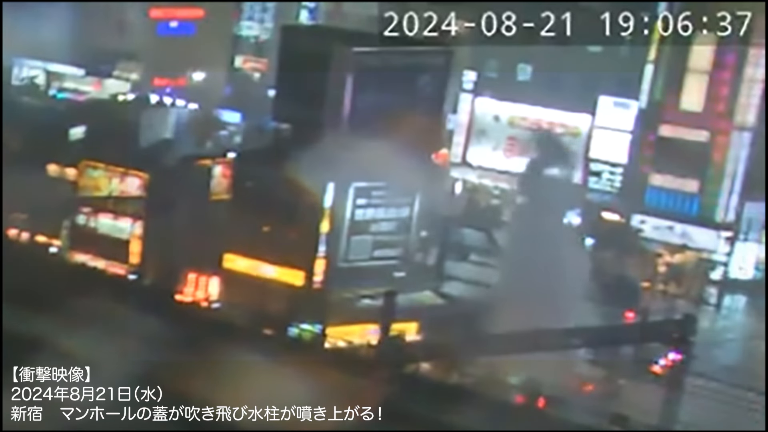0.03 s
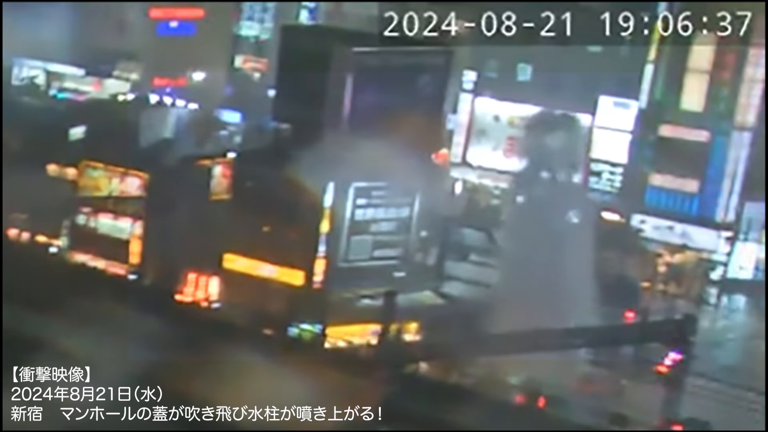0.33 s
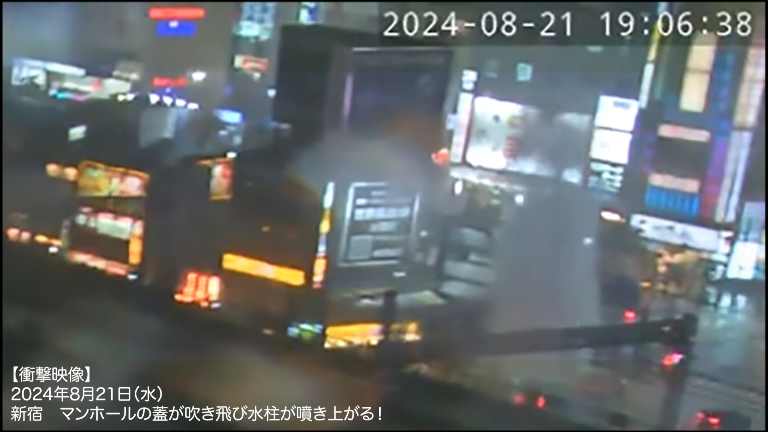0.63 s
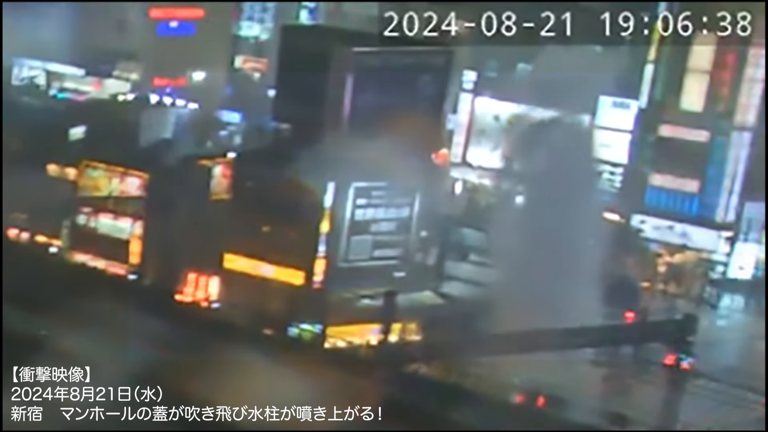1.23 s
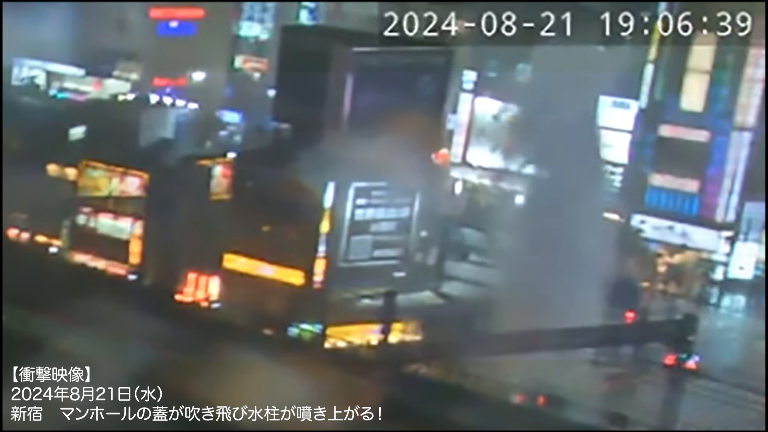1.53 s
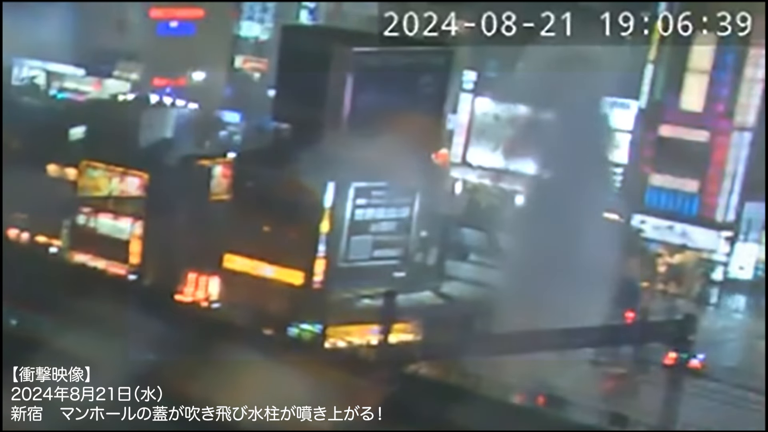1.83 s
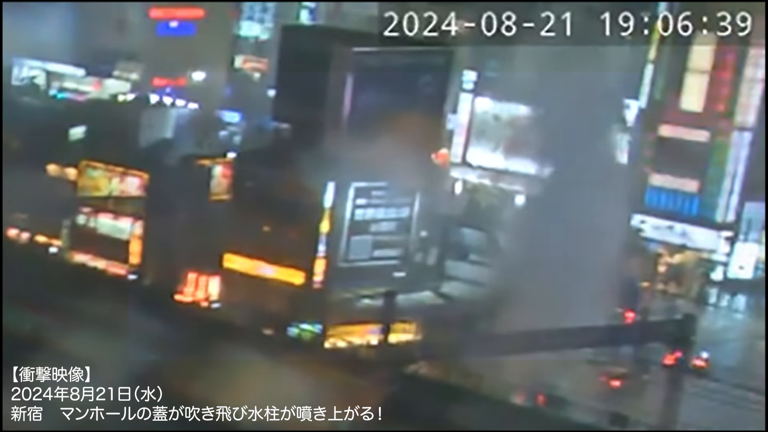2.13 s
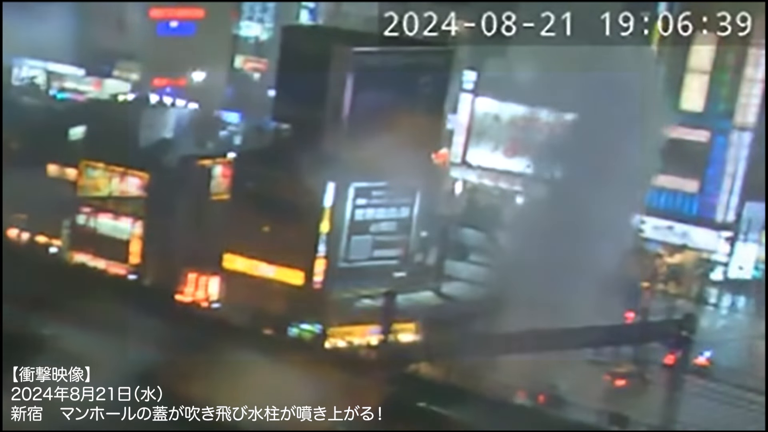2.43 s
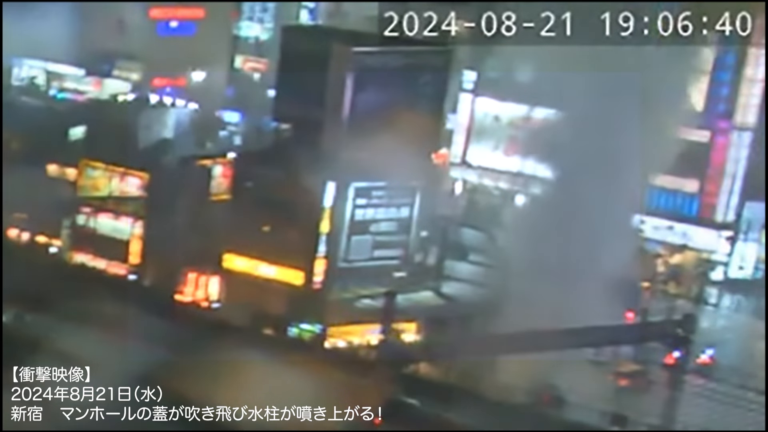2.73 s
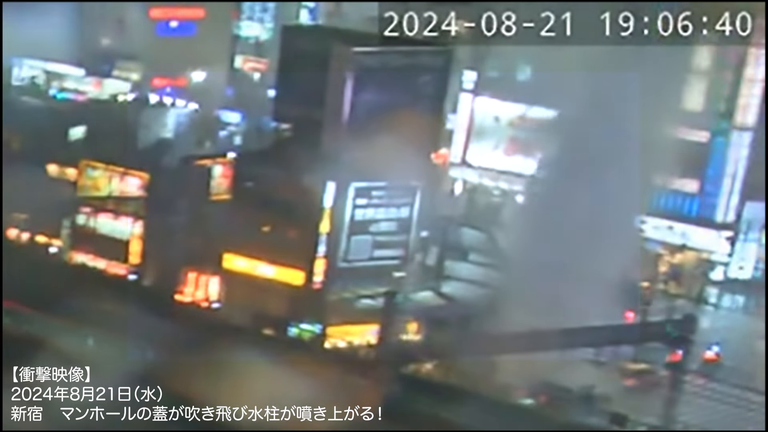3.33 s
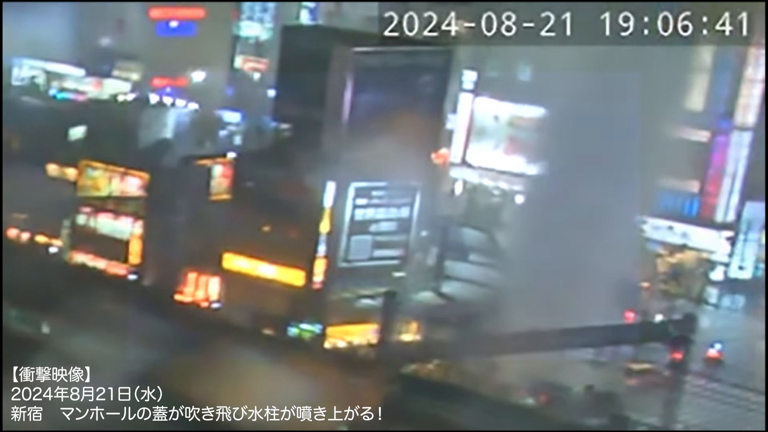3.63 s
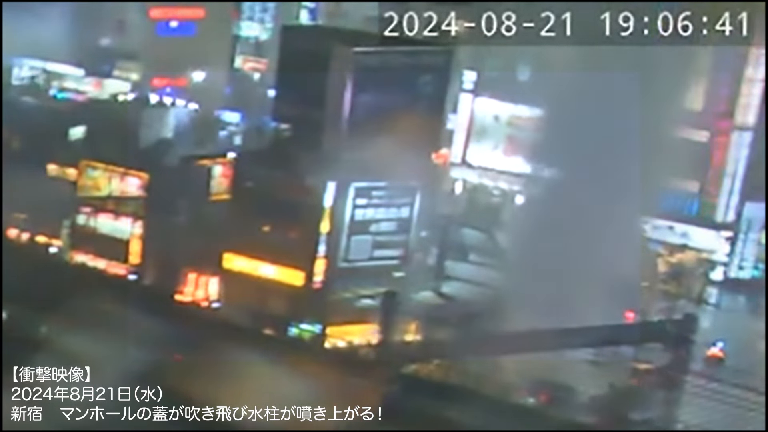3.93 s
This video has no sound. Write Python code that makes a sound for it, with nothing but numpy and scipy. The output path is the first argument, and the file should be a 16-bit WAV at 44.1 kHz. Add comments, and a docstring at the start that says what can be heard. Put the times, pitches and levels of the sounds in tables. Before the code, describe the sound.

A column of water bursts from a manhole on a rainy city street. First come steady rain, traffic rumble and close drips, then a spit of spray, a whoosh, thumps and a swelling roar. The small microphone whines faintly.

```python
"""Heavy rain on a city street at night, heard through a small fixed camera: a wash of drops over the rumble
of traffic and rushing water, a few close drips, a thin electrical whine. A storm drain spouts from a manhole:
trapped air spits out spray, the water column whooshes up and thumps, then roars on and swells."""
import sys
import numpy as np
from scipy import signal
from scipy.fft import rfft, irfft
from scipy.io import wavfile
from scipy.ndimage import uniform_filter1d

SR = 44100
rng = np.random.default_rng(int(sys.argv[2]) if len(sys.argv) > 2 else 0)


def inscribe(sig):
    """Save sig as 16-bit PCM at rate SR to the path in sys.argv[1].

    A 1-D sig is mono; a 2-D sig holds one channel per row.
    Samples are clipped to [-1, 1] before scaling.
    """
    pcm = np.round(np.clip(np.atleast_2d(sig).T, -1, 1) * 32767)
    wavfile.write(sys.argv[1], SR, pcm.astype(np.int16))


N = 176400

# steady street noise (Hz, dB per Hz)
STREET = [(18, -11.5), (33, 0), (52, 1.5), (78, -2), (106, 1), (138, -6), (185, -4.5), (225, -8.5), (340, -10.5), (470, -10.5), (600, -16), (850, -17), (1280, -23.5), (1800, -23.5), (3000, -30.5), (4100, -36.5), (4700, -44), (6400, -49), (7200, -61)]
STREET_DB, SWELL_DB, FLICKER_DB = -22, 0.16, 0.46
RAIN_PER_S, RAIN_SCATTER_DB, RAIN_DB = 900, 2.5, -44
# colour of the patter (Hz, dB per Hz)
RAIN = [(400, -7.5), (900, 2.5), (1900, -6), (3000, -0.5), (4200, -10.5), (5200, -15.5), (7000, -32)]
# close drips on the housing (s, level of the low tick dB, level of the high ping dB)
DRIPS = [(.036, -34, -52), (.119, -42, -38), (.176, -30, -38), (.265, -29, -52), (.402, -30.5, -45), (.566, -33, -39), (.698, -35, -45), (.848, -28, -39), (.913, -28, -52), (3.409, -27, -46)]
# what a drip rings with (Hz, dB, t60 s)
DRIP_MODES = [(2344, -2.5, 0.041), (3060, -2.5, .018), (4160, 1, 0.028), (4260, -1.5, 0.02), (4530, -5.5, .018)]
PING_ABOVE_HZ = 3500  # fixed
# electrical whine: three close tones that beat (Hz, rms dB)
WHINE = [(4021, -58), (4028, -63.5), (4035, -60.5)]  # fixed
# a higher tone that throbs: pitch Hz, beats per s, time of a crest s, depth 0-1
THROB_HZ, THROB_PER_S, THROB_CREST_S, THROB_DEPTH = 5926, 5.03, .03, .6  # fixed
THROB_DB, WHINE_WANDER_HZ = -65.5, 1.1
# spray as the air breaks out: start s, attack s, hold s, decay time s, level dB
SPRAY_S, SPRAY_ATTACK_S, SPRAY_HOLD_S, SPRAY_DECAY_S, SPRAY_DB = 2.214, 0.026, 0.036, 0.015, -18.5
SPRAY_TAIL_DB, SPRAY_TAIL_S = -8, 0.27
SPRAY = [(180, 5.5), (300, 6), (600, 9), (790, 10), (950, 1.5), (1120, 3.5), (1320, -6), (1550, -1.5), (2100, 1.5), (2450, -6), (3050, -2.5), (3700, -10.5), (4500, -20.5), (6000, -28), (7200, -36.5)]
# whoosh of the rising column
GUSH_S, GUSH_ATTACK_S, GUSH_HOLD_S, GUSH_DECAY_S, GUSH_DB = 2.235, 0.047, 0.084, 0.15, -19.5
GUSH = [(60, -7.5), (130, 0), (220, -4.5), (380, 0.5), (520, -4.5), (640, 0), (790, -4.5), (950, -11.5), (1300, -14.5), (2500, -37)]
# roar of the spout (s, level dB)
ROAR_LEVEL = [(2.23, -42.5), (2.29, -22), (2.44, -20.5), (2.72, -20.5), (2.9, -23), (3.2, -21), (3.45, -15.5), (3.65, -17), (3.85, -16.5), (4.0, -16)]
ROAR = [(15, -33.5), (33, -4.5), (52, -4), (72, -4.5), (105, -1.5), (150, -3), (210, -9.5), (320, -15), (500, -25), (900, -36.5)]
# water falling back on the road (s, level dB)
SPLASH_LEVEL = [(2.3, -49), (2.55, -33.5), (2.85, -29), (3.05, -27.5), (3.35, -29.5), (3.65, -28), (3.85, -26), (4.0, -23.5)]
SPLASH = [(90, -26), (175, -3.5), (240, -4), (320, 0.5), (480, -5), (620, -7), (800, -6.5), (1200, -24.5), (2500, -25), (5000, -46)]
# thumps of air pockets and slugs of water (s, pressure, half width s)
THUMPS = [(2.235, 0.49, 0.00056), (2.253, -.33, .0007), (2.289, .33, 0.0015), (2.375, 0.57, .0012), (2.3832, 0.96, .00037), (2.497, .46, 0.0018), (2.597, 0.45, 0.00025), (2.693, -0.44, 0.002)]
REBOUND = 0.2  # height of the swing back, as a share of the pulse
CHURN_DB = 0.5
TOP_HZ = 7100  # fixed
DRIP_SPLAT_DB, DRIP_SPLAT_S, DRIP_ATTACK_S = -9, .005, 0.00044
# hiss of fine droplets, from a drip or after the burst (Hz, dB per Hz)
MIST_S, MIST_ATTACK_S, MIST_HOLD_S, MIST_DECAY_S, MIST_DB = 2.31, 0.053, 0.09, 0.045, -42
DROPLETS = [(1400, -4.5), (2100, 5.5), (3100, -4), (4300, -6.5), (5200, -14.5), (7200, -35)]
# a sheet of rain sweeps over the wet road (Hz, dB per Hz)
SHEET = [(350, -9.5), (520, 3.5), (650, -5), (900, 9), (1200, -8.5), (1600, -0.5), (1900, 0.5), (2300, -14.5), (4000, -20.5)]
SHEET_S, SHEET_ATTACK_S, SHEET_HOLD_S, SHEET_DECAY_S, SHEET_DB = 1.03, 0.21, 0.4, 0.53, -39


def undb(db):
    return 10 ** (np.asarray(db) / 20)


def unit(x):
    return x / np.sqrt(np.mean(x ** 2) + 1e-20)


def clock():
    return np.arange(N) / SR


def walk(rate):
    """Random levels held 1 / rate s and slewed twice; spread near 1."""
    k = max(int(SR / rate), 1)
    held = rng.standard_normal(4096)[(np.arange(N) // k) % 4096]  # fixed
    return unit(uniform_filter1d(uniform_filter1d(held, k), k))


def colour(x, points):
    """Give x a spectrum of (Hz, dB) points, falling away beyond both ends; rms 1."""
    hz, db = np.array(points, float).T
    f = np.log2(np.maximum(np.fft.rfftfreq(N, 1 / SR), 1))
    outside = np.maximum(np.log2(hz[0]) - f, 0) + np.maximum(f - np.log2(hz[-1]), 0)
    return unit(irfft(rfft(x) * undb(np.interp(f, np.log2(hz), db) - 20 * outside), N))


def turbulence(depth_db, rate):
    """Noise whose octave bands each flicker by themselves."""
    octave = np.log2(np.maximum(np.fft.rfftfreq(N, 1 / SR), 1))
    noise = rfft(rng.standard_normal(N))
    return sum(irfft(noise * np.maximum(1 - abs(octave - k), 0), N) * undb(depth_db * walk(rate)) for k in range(3, 15))


def impacts(per_s, scatter_db):
    """Randomly timed clicks, many small and a few large."""
    size = undb(scatter_db * np.minimum(rng.exponential(size=N), 5))  # fixed
    return (rng.random(N) < per_s / SR) * size * np.sign(rng.standard_normal(N))


def envelope(start, attack, hold, decay):
    """Straight rise, hold, exponential fall."""
    t = clock() - start
    return np.clip(t / attack, 0, 1) * np.exp(-np.maximum(t - attack - hold, 0) / decay)


def fader(points):
    """Gain along (s, dB) points, silent before the first."""
    s, db = np.array(points).T
    return undb(np.interp(clock(), s, db, left=-np.inf))


def tone(hz, db):
    """A sine whose pitch wanders slightly."""
    return undb(db) * np.sqrt(2) * np.sin(2 * np.pi * np.cumsum(hz + WHINE_WANDER_HZ * walk(8)) / SR)


def street():
    """Distant traffic, running water and far rain merge into one wash."""
    return colour(turbulence(depth_db=FLICKER_DB, rate=12), STREET) * undb(STREET_DB + SWELL_DB * walk(6.5))


def rain():
    """Dense patter of nearer drops."""
    return colour(impacts(RAIN_PER_S, RAIN_SCATTER_DB), RAIN) * undb(RAIN_DB)


def drips():
    """Single drops splat on the housing, each ringing it a little differently."""
    out, splats, t = np.zeros(N), np.zeros(N), clock()[:SR // 10]
    hz, db, t60 = np.array(DRIP_MODES).T[:, :, None]
    for s, tick_db, ping_db in DRIPS:
        detune = rng.standard_normal((len(hz), 1))
        ring = undb(db + np.where(hz > PING_ABOVE_HZ, ping_db, tick_db) - 60 * t / t60) * np.sin(2 * np.pi * hz * (1 + .012 * detune) * t)  # fixed
        i = int(s * SR)
        out[i:i + len(t)] += (ring.sum(0) * np.minimum(t / DRIP_ATTACK_S, 1))[:N - i]
        splats[i:i + len(t)] += undb(tick_db + DRIP_SPLAT_DB) * np.exp(-t / DRIP_SPLAT_S)[:N - i]
    return out + splats * colour(rng.standard_normal(N), DROPLETS)


def whine():
    """A thin electrical whine shimmers; a fainter, higher one throbs evenly."""
    throb = 1 + THROB_DEPTH * np.cos(2 * np.pi * THROB_PER_S * (clock() - THROB_CREST_S))
    return sum(tone(hz, db) for hz, db in WHINE) + throb * tone(THROB_HZ, THROB_DB)


def burst():
    """Air spits out a crackling spray that echoes off the buildings; the water column whooshes after it."""
    spray = colour(impacts(per_s=14000, scatter_db=2.5), SPRAY) * envelope(SPRAY_S, SPRAY_ATTACK_S, SPRAY_HOLD_S, SPRAY_DECAY_S)
    echo = colour(rng.standard_normal(N), SPRAY) * envelope(SPRAY_S + SPRAY_ATTACK_S, SPRAY_ATTACK_S, SPRAY_HOLD_S, SPRAY_TAIL_S)
    gush = colour(turbulence(depth_db=CHURN_DB, rate=26), GUSH) * envelope(GUSH_S, GUSH_ATTACK_S, GUSH_HOLD_S, GUSH_DECAY_S)
    return undb(SPRAY_DB) * (spray + undb(SPRAY_TAIL_DB) * echo) + undb(GUSH_DB) * gush


def spout():
    """The churning jet roars low while ever more water crashes back on the road."""
    roar = colour(turbulence(depth_db=CHURN_DB, rate=25), ROAR) * fader(ROAR_LEVEL)
    splash = colour(impacts(per_s=2500, scatter_db=1.2), SPLASH) * fader(SPLASH_LEVEL)
    return roar + splash


def thumps():
    """Each air pocket or slug of water is one pressure pulse with a rebound."""
    out = np.zeros(N)
    for s, pressure, width in THUMPS:
        u = (clock() - s) / width
        out -= pressure * (1 / (1 + u ** 2) - REBOUND * np.exp(-((u - 5) / 4) ** 2))
    return out


def mist():
    """Fine droplets hiss on briefly after the burst."""
    return colour(impacts(per_s=3600, scatter_db=3.0), DROPLETS) * envelope(MIST_S, MIST_ATTACK_S, MIST_HOLD_S, MIST_DECAY_S) * undb(MIST_DB)


def sheet():
    """A gust throws a sheet of rain across the road."""
    return colour(impacts(per_s=2500, scatter_db=1), SHEET) * envelope(SHEET_S, SHEET_ATTACK_S, SHEET_HOLD_S, SHEET_DECAY_S) * undb(SHEET_DB)


def scene():
    return (street() + rain() + sheet() + drips() + whine() + burst() + mist() + spout() + thumps())[None]


def record(dry):
    """The camera holds peaks at full scale and passes nothing above its narrow band."""
    return signal.sosfilt(signal.cheby1(12, .1, TOP_HZ, fs=SR, output="sos"), np.clip(dry, -1, 1))  # fixed


dry = scene()
out = record(dry)
inscribe(out)
```